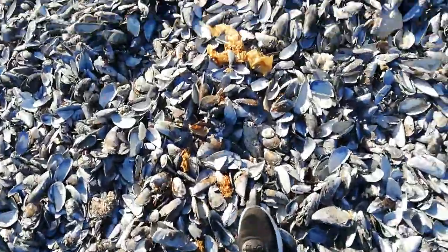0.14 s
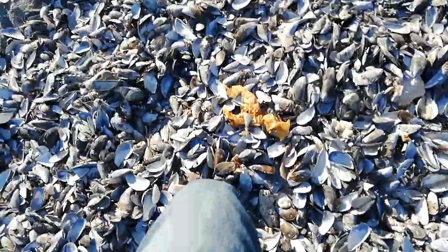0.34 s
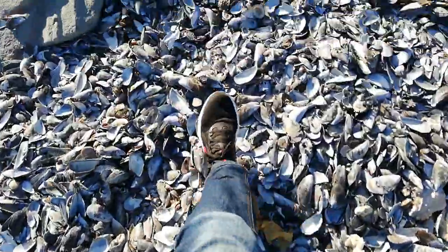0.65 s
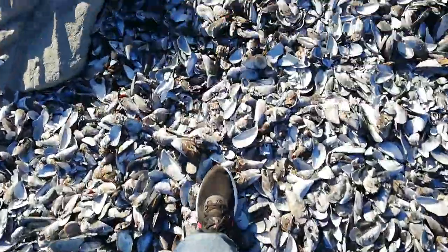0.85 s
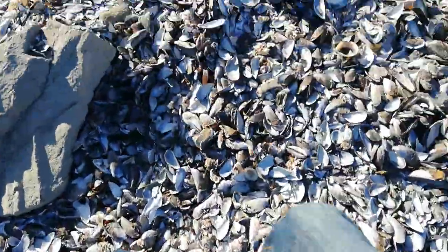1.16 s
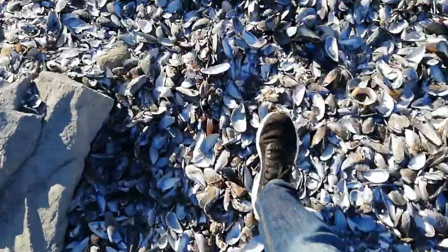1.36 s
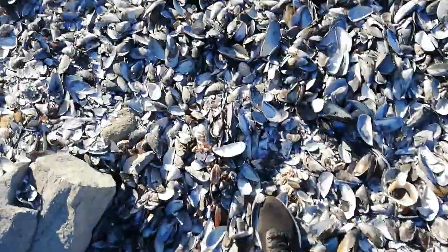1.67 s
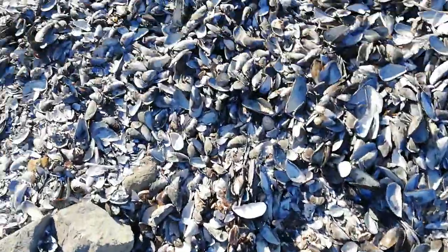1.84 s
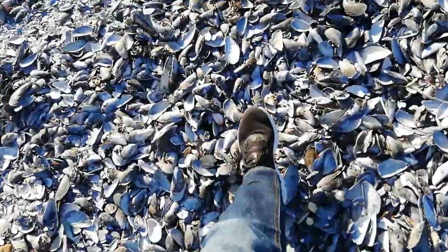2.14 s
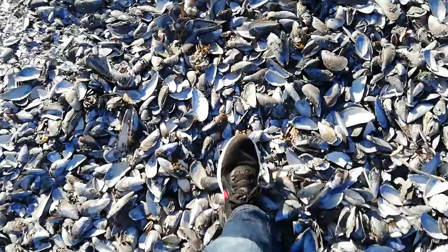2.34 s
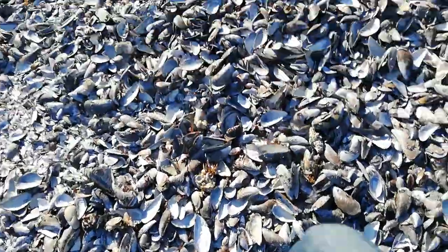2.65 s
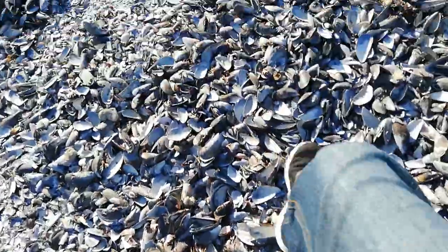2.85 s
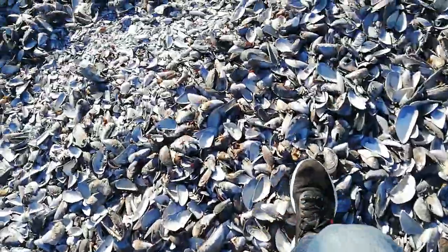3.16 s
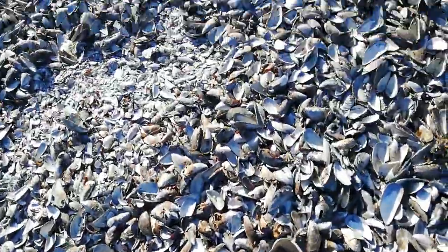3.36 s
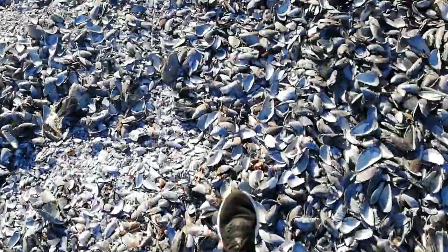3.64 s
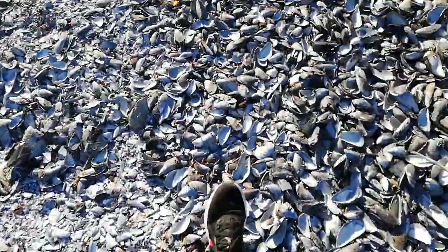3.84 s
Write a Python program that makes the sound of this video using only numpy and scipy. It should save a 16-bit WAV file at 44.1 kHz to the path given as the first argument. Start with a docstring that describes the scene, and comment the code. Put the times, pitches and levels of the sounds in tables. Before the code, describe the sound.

Footsteps crunch on a thick bed of mussel shells outdoors, about six steps at a walking pace, with brittle cracks, snaps and small ticks between them; light wind rumbles on a close stereo microphone.

```python
"""Walking on mussel shells

Someone walks over a deep bed of mussel shells, heard from just above the feet.
Each sole crushes many small pieces, made of tiny damped rings and gritty noise.
Single shells crack, cave in and snap with short rings and puffs of noise; some sound a hollow note.
The loose bed scatters every click, and a light wind of filtered noise rumbles on the microphone."""
import sys
import numpy as np
from scipy import signal
from scipy.fft import rfft, irfft, next_fast_len
from scipy.io import wavfile
from scipy.ndimage import uniform_filter1d, map_coordinates

SR = 44100
rng = np.random.default_rng(int(sys.argv[2]) if len(sys.argv) > 2 else 0)


def wav_out(sig):
    """Save sig, one row per channel (or a flat mono array), as 16-bit PCM at SR to the path in sys.argv[1]."""
    wavfile.write(sys.argv[1], SR, np.round(np.clip(np.atleast_2d(sig).T, -1, 1) * 32767).astype(np.int16))


N = 176400  # length of the scene in samples (4 s)
SIZE = 2048  # length of one short sound in samples
TOP_HZ = 15900  # nothing is heard above this
GRAIN_LOW_HZ = 583  # lowest pitch of a small piece
GRAIN_T60_S = 0.0056  # typical time for a small piece to fade by 60 dB
CHIP_T60_S = 0.0083  # the same for a puff of chips


def amp(db):
    """Turn decibels into a gain."""
    return 10 ** (np.asarray(db) / 20)


def unit(x):
    """Scale to an average (rms) level of 1."""
    return x / np.sqrt(np.mean(x ** 2) + 1e-20)


def along(points, hz):
    """Read a value at each frequency from (Hz, value) points, spaced as the ear hears pitch."""
    f, v = np.transpose(points)
    return np.interp(np.log(hz + 1), np.log(f + 1), v)


def curve(points):
    """Join (seconds, value) points by straight lines, one value per sample."""
    return np.interp(np.arange(N) / SR, *np.transpose(points))


def sides(db):
    """Left and right gains for a left minus right difference in dB, keeping the total power."""
    gains = amp(np.array([[.5], [-.5]]) * db)
    return gains / np.sqrt(np.mean(gains ** 2, axis=0))


def filtered(x, response):
    """Change the tone of x by a gain that depends on frequency."""
    m = next_fast_len(N + SR // 2)  # spare room keeps the end from wrapping onto the start
    return irfft(rfft(x, m) * response(np.fft.rfftfreq(m, 1 / SR)), m)[..., :N]


def add(out, s, x):
    """Mix x into out at s seconds."""
    i = max(0, round(s * SR))
    out[:, i:i + x.shape[-1]] += x[..., :max(0, N - i)]


def shell_colour():
    """The tone of the shells as a filter that never sounds ahead of its input, mean power 1."""
    # Tone of the shells. Each row: frequency in Hz, level in dB.
    shell_tone = [(120, -16.5), (400, -11), (700, -9.5), (1100, -5), (2500, -5.5), (3400, 4), (4600, 5.5),
                  (6300, 2), (8000, 6), (9400, 9.5), (10500, 3), (12300, -5), (15700, -13)]
    cepstrum = irfft(np.log(amp(along(shell_tone, np.fft.rfftfreq(SIZE, 1 / SR)))))
    # fold the second half onto the first: this makes the filter minimum-phase
    cepstrum[1:SIZE // 2] *= 2
    cepstrum[SIZE // 2 + 1:] = 0
    response = np.exp(rfft(cepstrum))
    return response / np.sqrt(np.mean(abs(response) ** 2))


def shards(t60, count, size):
    """Damped rings of random pitch that reach two ports at slightly different times."""
    port_delay_s = .00004  # scatter of arrival times between the ports
    t = np.arange(size) / SR
    hz = rng.uniform(GRAIN_LOW_HZ, TOP_HZ, (count, 1))
    life = t60 * np.exp(.4 * rng.standard_normal((count, 1)))
    lag = port_delay_s * rng.standard_normal((count, 1))
    fade = amp(-60 * t / life) * np.sqrt(t60 / life)  # long rings start softer
    return np.array([fade * np.sin(2 * np.pi * hz * (t + k * lag)) for k in (.5, -.5)])


def wind():
    """Noise as a low, nearly mono rumble that swells in gusts, with a steady faint hiss."""
    # Tone of the wind. Each row: frequency in Hz, level in dB.
    rumble = [(20, -16), (50, -5), (100, -1), (180, -5), (300, -11), (600, -25.5), (2000, -18),
              (15000, -57)]
    # Stereo width. Each row: frequency in Hz, left-right difference against the shared part in dB.
    width = [(70, -23), (130, -24.5), (260, -3), (3000, 6.5)]
    # Gusts on the microphone. Each row: middle in seconds, half length in seconds, rise in dB.
    gusts = [(1.217, 0.047, 9.5), (2.07, 0.17, 11), (2.655, 0.11, 7.5), (2.982, 0.13, 9), (3.65, 0.31, 6.5)]
    breeze_db = -43.5  # level between gusts
    mid, side = filtered(rng.standard_normal((2, N)), lambda hz: amp(along(rumble, hz)))
    side = filtered(side, lambda hz: amp(along(width, hz)))
    air = unit(np.array([mid + side, mid - side]))
    t = np.arange(N) / SR
    gust_db = sum(db * np.exp(-((t - s) / half) ** 2) for s, half, db in gusts)
    # only the low part, below about 300 Hz, swells
    buffet = filtered(air, lambda hz: 1 / (1 + (hz / 300) ** 4))
    return amp(breeze_db) * (air + (amp(gust_db) - 1) * buffet)


def bed(x):
    """The loose bed scatters each click into a very short noisy tail that keeps changing."""
    tail_t60_s, tail_rise_s = 0.052, 0.0013
    out, t = np.zeros((2, N)), np.arange(2 * SIZE) / SR
    fade = amp(-60 * t / tail_t60_s) * (1 - np.exp(-t / tail_rise_s))
    for i in range(0, N, SIZE):  # each short block gets a fresh tail
        tail = rng.standard_normal((2, len(t))) * fade / np.linalg.norm(fade)
        add(out, i / SR, signal.fftconvolve(x[:, i:i + SIZE], tail, axes=1))
    return out


def settling():
    """Disturbed pieces keep slipping into place: faint ticks of a few damped rings each."""
    ticks_per_s, softest_db, loudest_db = 90, -53, -35  # peak levels
    out, colour = np.zeros((2, N)), shell_colour()
    for place, size in rng.random((int(ticks_per_s * N / SR), 2)):
        rings = shards(GRAIN_T60_S, count=14, size=SIZE).sum(axis=1)
        tick = irfft(rfft(rings) * colour)
        peak_db = softest_db + (loudest_db - softest_db) * size
        add(out, place * N / SR, amp(peak_db) * tick / abs(tick).max())
    return out


def hollow_notes():
    """Hollow notes of whole shells, many sounding as they crack: three damped tones each."""
    # Hollow notes. Each row: start in seconds, level in dB, pitch in Hz.
    note_list = [(.13, -6, 3270), (1.679, -2.5, 880), (1.75, -11.5, 1460), (1.812, -15, 1430),
                 (2.074, -13.5, 1690), (2.311, 0, 1600), (2.557, -4, 3370), (2.765, -9.5, 477),
                 (3.41, -9, 1076), (3.447, -11.5, 1030), (3.57, -3, 1110), (3.6, -7, 1065),
                 (3.601, -5, 2710)]
    # Tones of a note. Each row: multiple of the pitch, level in dB, time to fade 60 dB in seconds.
    note_tones = [(.52, -7, 0.0037), (1, 0.5, 0.0069), (1.65, -11.5, 0.0077)]
    rise_s = 0.0006
    out, t = np.zeros((2, N)), np.arange(SIZE) / SR
    for s, db, hz in note_list:
        note = np.zeros(SIZE)
        for k, tone_db, t60 in note_tones:
            fade = amp(tone_db - 60 * t / t60)
            note += fade * np.sin(2 * np.pi * (k * hz * t + rng.random()))
        add(out, s, amp(db) * (1 - np.exp(-t / rise_s)) * note)
    return out


def big_snap():
    """A large shell sings and sheds chips while it splits, then its tones ring out."""
    # One shell snapping, then striking again. Each row: start in seconds, level in dB,
    # length of the break in seconds.
    snap_list = [(1.282, -5.5, 0.0027), (1.2877, -1, 0.00026)]
    # Tones of the shell. Each row: pitch in Hz, level in dB, time to fade 60 dB in seconds.
    snap_tones = [(3375, -10.5, 0.02), (3910, 0.5, 0.0038), (4480, -8.5, 0.0057), (7500, -6, 0.0064),
                  (9700, -13, 0.017), (12420, -11, 0.0059)]
    rise_s, snap_chip_db = 0.00043, -8.5
    out, t = np.zeros((2, N)), np.arange(SIZE) / SR
    for s, db, length in snap_list:
        def fade(t60):
            """Hold the level during the break, then die away."""
            return amp(db - 60 * np.maximum(t - length, 0) / t60) * (1 - np.exp(-t / rise_s))
        chips = rng.standard_normal((2, SIZE)) * fade(CHIP_T60_S)
        add(out, s, amp(snap_chip_db) * irfft(rfft(chips) * shell_colour()))
        for hz, tone_db, t60 in snap_tones:
            drift = np.cumsum(rng.normal(0, .06, (2, SIZE)), axis=1)  # the tone wanders a little
            add(out, s, amp(tone_db) * fade(t60) * np.sin(2 * np.pi * hz * t + drift))
    return out


def break_push(length, count):
    """A few splinters go first, the shell gives way in jerks, then its fragments land."""
    warning_s, warning_db = 0.0063, -19  # splinters fall within this time before the break
    debris_s, debris_db = 0.016, -13.5  # fragments land within this time after it
    push = np.zeros(SIZE)
    for span, size in [(-warning_s, amp(warning_db)), (debris_s, amp(debris_db)), (length, .5)]:
        at = (rng.random(count) * span * SR).astype(int) % SIZE  # early ones wrap to the end
        push[at] = rng.normal(0, size, count)
    push[0] = 1
    return rfft(push)


def cracks():
    """Each shell breaks in its own way: damped rings under a puff of noisy chips."""
    # Single shells cracking. Each row: time in seconds, level in dB, extra level of the hollow
    # body in dB, extra level of the shell ring in dB.
    crack_list = [(0.016, -6, -16.5, -16), (0.084, -6, -16, -9), (0.129, -12, -5.5, -1),
                  (0.149, -6.5, -25, -2), (0.161, -7.5, -17.5, 4), (0.22, -4.5, -25, -10.5),
                  (0.244, -11.5, -20, -7), (0.315, -10, -27, -12), (0.325, -4, -18, -7),
                  (0.408, 1, -22.5, -16), (0.51, -9, -25, -2), (0.538, -4, -15, -6.5),
                  (0.587, 1.5, -21, -8.5), (0.654, -7, -18.5, -8), (0.668, -2.5, -20.5, -32),
                  (0.726, -6.5, -13, -5), (0.814, -4.5, -35, 1), (0.831, -6.5, -15, 0),
                  (0.937, -13, -26, 4.5), (1.014, -7, -24, 1.5), (1.03, -2, -22.5, -8),
                  (1.069, 2, -23.5, -3), (1.127, -6.5, -22.5, -7), (1.134, -9, -22, -5),
                  (1.352, -14, -21, 0), (1.36, -2.5, -22, -9.5), (1.459, -7.5, -20, -8.5),
                  (1.488, -4.5, -29, -12), (1.599, -8, -19, -10), (1.706, -2, -20, -6),
                  (1.75, -9, -13.5, -4.5), (1.813, -11.5, -7, -5.5), (1.83, -1, -15, -7),
                  (2.073, -7, -19, -8), (2.123, -14, -12.5, -10.5), (2.2, -15, -14, -9),
                  (2.249, -1, -18, -13), (2.285, -3, -20, -8), (2.307, -1.5, -15, -6),
                  (2.319, -2, -18, -11), (2.338, -2, -16.5, -15), (2.424, -10, -6, -3),
                  (2.458, -8.5, -8.5, 1.5), (2.527, -4, -18.5, -9.5), (2.5559, -4, -23.5, -0.5),
                  (2.601, -7.5, -9, 2.5), (2.652, -11.5, -20, -8), (2.677, -13.5, -15, -2.5),
                  (2.702, -5.5, -23, -11.5), (2.748, -6, -16, -3.5), (2.764, -6, -17, -7),
                  (2.854, -7, -18.5, -6), (2.917, -10, -23, -14), (2.952, -7, -21, -8.5),
                  (2.988, -4.5, -17, -16.5), (3.037, 0, -26.5, -18.5), (3.076, 0, -23, -30),
                  (3.186, -4.5, -17.5, -5.5), (3.384, 0, -25, -9.5), (3.409, -1.5, -23, -5.5),
                  (3.444, -5.5, -21, -10.5), (3.523, -1, -16.5, -9.5), (3.569, -7.5, -15, -5),
                  (3.599, -5, -11, -3.5), (3.638, -10, -19.5, -6), (3.76, -9.5, -13.5, -3),
                  (3.842, -5.5, -17, -1.5), (3.961, -2, -11, -6), (3.982, 1, -22.5, -6)]
    break_s, break_rise_s = 0.0018, 0.001  # length of the jerks, time to full force
    ring_t60_s, chip_db = 0.011, 3.5  # chips against ring
    body_base_db, ring_base_db, edge_db = -18.5, -21, -22.5  # low, middle and top of a crack
    out, t, hz = np.zeros((2, N)), np.arange(SIZE) / SR, np.fft.rfftfreq(SIZE, 1 / SR)
    low = 1 / (1 + (hz / 2300) ** 8)
    high = 1 - 1 / (1 + (hz / 6500) ** 8)
    body = low * (1 - 1 / (1 + (hz / 450) ** 4))
    colour, lead = shell_colour(), SIZE // 4  # lead: samples kept for the early splinters
    rise = np.minimum(t / break_rise_s, 1)
    for s, db, body_db, ring_db in crack_list:
        chips = unit(rng.standard_normal((2, SIZE)) * rise * amp(-60 * t / CHIP_T60_S))
        ring = unit(shards(ring_t60_s, count=36, size=SIZE).sum(axis=1) * rise)
        z = rfft(ring + amp(chip_db) * chips) * colour * break_push(break_s, count=4)
        bands = [(z[[0, 0]] * body, body_db + body_base_db),  # the body is the same on both sides
                 (z * (1 - low - high), ring_db + ring_base_db),
                 (z * high, edge_db)]
        x = sum(amp(db + band_db) * unit(irfft(b)) for b, band_db in bands)
        add(out, s - lead / SR, np.roll(x, lead, axis=1))
    return out


def fractures(level_db, count=9, size=256):
    """Tiny breaks of a few damped rings each: the louder the crunch, the denser they fall."""
    grains_per_s, denser_db_per_db = 1600, 0.5  # breaks per second at -20 dB, and their growth
    spread_db = 3  # how unequal the breaks are
    density_db = np.clip(denser_db_per_db * (level_db + 20), -20, 10)
    rate = grains_per_s * amp(density_db) * (level_db > -70)
    at = np.flatnonzero(rng.random(N) < rate / SR)
    strength = unit(amp(spread_db * np.minimum(rng.exponential(size=len(at)), 3)))
    # sparser breaks are stronger, so the level follows the curve
    strength = strength * amp(level_db[at]) * np.sqrt(SR / rate[at] / count)
    strength = np.repeat(strength, count)
    rings = shards(GRAIN_T60_S, count=len(strength), size=size)
    rings = unit(rings) / np.sqrt(size) * strength[:, None]
    where = (np.repeat(at, count)[:, None] + np.arange(size)).ravel()
    return np.array([np.bincount(where, r.ravel(), N + size)[:N] for r in rings])


def piece_colours(x):
    """Shells giving way stress their own resonances: the tone shifts over some milliseconds."""
    piece_colour_db = 2.5  # how strongly the tone varies
    z = signal.stft(x, nperseg=256)[2]
    # random patches over frequency and time
    field = uniform_filter1d(rng.standard_normal(z.shape[1:]), size=4, axis=0)
    field = unit(uniform_filter1d(field, size=5, axis=1))
    return signal.istft(z * unit(amp(piece_colour_db * field)))[1][:, :N]


def crunch():
    """The soles crush small pieces and grind their grit; some shells cave in at once."""
    # Crunch under the foot, one list per step. Each row: time in seconds, level in dB.
    steps = [
        [(0, -21), (.04, -31.5), (.06, -25), (.11, -37.5), (.17, -32.5), (.33, -34.5), (.37, -42.5)],
        [(.49, -36), (.63, -34), (.69, -29), (.725, -14), (.76, -18), (.82, -21), (.85, -30.5), (.92, -35.5),
         (1.0, -31.5), (1.11, -31.5), (1.17, -43)],
        [(1.34, -41), (1.4, -31), (1.455, -16), (1.475, -28), (1.55, -18), (1.59, -26), (1.69, -20.5),
         (1.74, -34), (1.86, -33), (1.94, -46.5)],
        [(2.19, -42), (2.24, -35), (2.255, -26), (2.315, -21), (2.345, -27), (2.37, -12.5), (2.41, -13.5),
         (2.5, -39), (2.82, -41.5)],
        [(2.97, -39), (3.06, -29.5), (3.08, -21), (3.24, -24.5), (3.265, -18), (3.325, -17), (3.35, -32.5),
         (3.47, -45), (3.73, -42.5)],
        [(3.8, -35), (3.835, -22), (3.93, -23), (4, -21.5)],
    ]
    # Shells caving in as a run of breaks. Each row: start in seconds, length in seconds, level in dB.
    collapses = [(0.413, 0.021, -17), (0.539, 0.011, -19.5), (0.586, 0.014, -17), (0.937, .009, -20),
                 (1.536, 0.0022, -13.5), (2.607, 0.009, -19.5), (3.897, 0.0057, -14)]
    crunch_db, sand_db = -2, -8  # small breaks, grit
    lurch_per_s, lurch_db = 300, 3  # the sole sinks in small jerks
    level_db = curve([point for step in steps for point in step])
    cave_db, t = np.full(N, -120.), np.arange(N) / SR
    for s, length, db in collapses:
        cave_db[(t >= s) & (t < s + length)] = db
    grit = amp(sand_db) * (amp(level_db) + amp(cave_db)) * rng.standard_normal((2, N))
    knots = np.clip(rng.standard_normal(int(N * lurch_per_s / SR) + 4), -2, 1)
    lurch = unit(amp(lurch_db * map_coordinates(knots, [t * lurch_per_s])))
    x = lurch * (grit + amp(crunch_db) * fractures(np.maximum(level_db, cave_db)))
    return signal.fftconvolve(piece_colours(x), irfft(shell_colour())[None], axes=1)[:, :N]


def scene():
    """All the shells, their scatter in the bed, and the wind."""
    # Where the shells are trodden. Each row: time in seconds, left minus right in dB.
    foot_side = [(0, 1), (.45, -4.5), (1.36, 4.5), (1.68, 0.5), (2.15, -1.5), (2.7, 1), (2.87, 10.5),
                 (3.1, 2.5), (3.57, -1.5)]
    bed_db = -10
    air = wind()
    underfoot = (cracks() + crunch()) * sides(curve(foot_side))
    shells = underfoot + big_snap() + hollow_notes() + settling()
    return air + shells + amp(bed_db) * bed(shells)


def record(dry):
    """Two ports differ in tone; the loudest peaks are rounded off and the top is cut."""
    # Tone of the ports. Each row: frequency in Hz, left minus right in dB.
    port_tilt = [(400, 0), (750, 4), (2000, 3), (3300, 1.5), (5300, -6.5), (8500, 0), (15000, 7)]
    x = filtered(dry, lambda hz: sides(along(port_tilt, hz)))
    x = x / (1 + x ** 6) ** (1 / 6)
    return filtered(x, lambda hz: hz < TOP_HZ)


dry = scene()
out = record(dry)
wav_out(out)
```